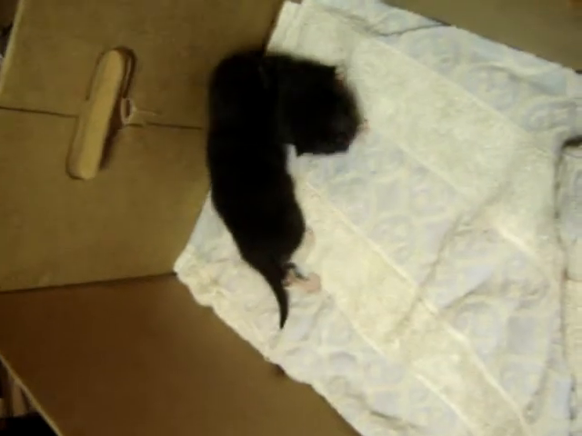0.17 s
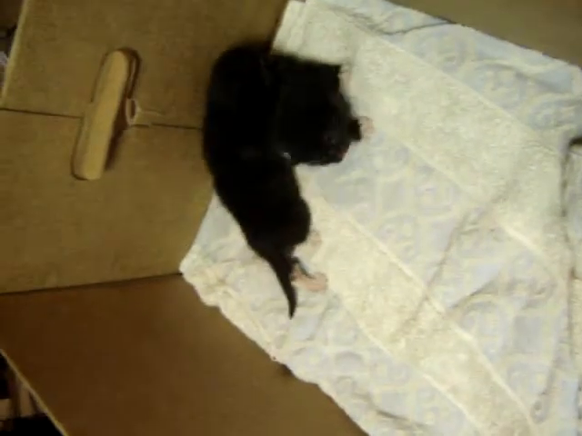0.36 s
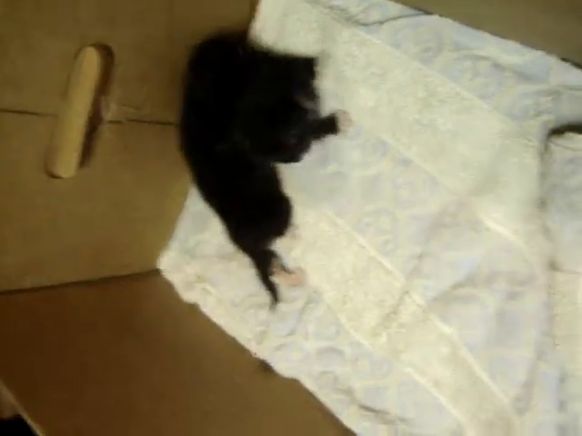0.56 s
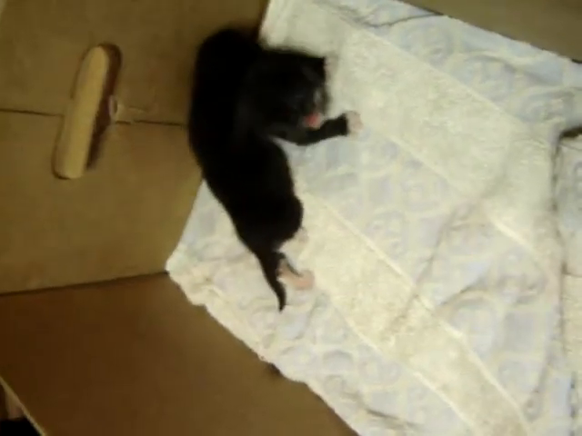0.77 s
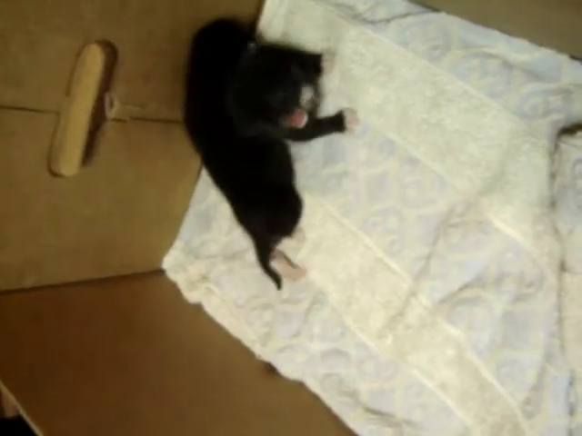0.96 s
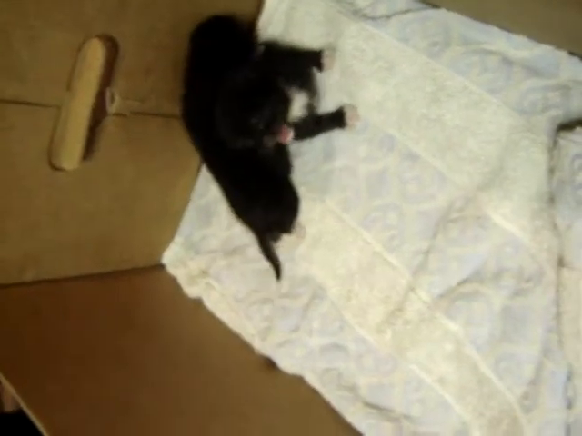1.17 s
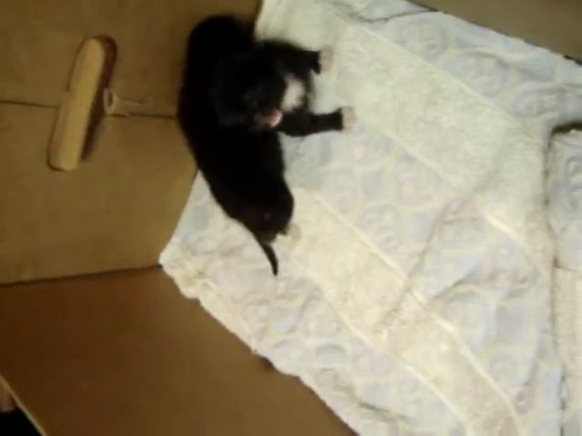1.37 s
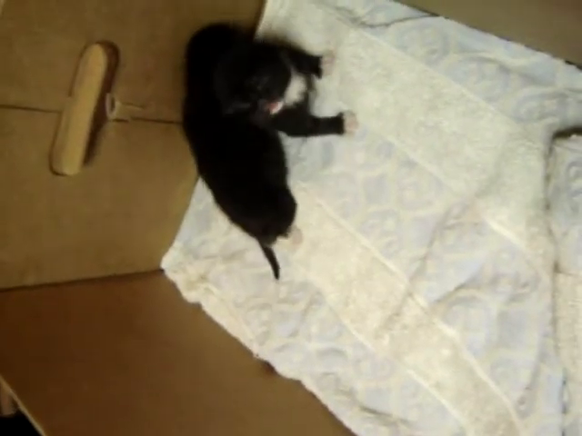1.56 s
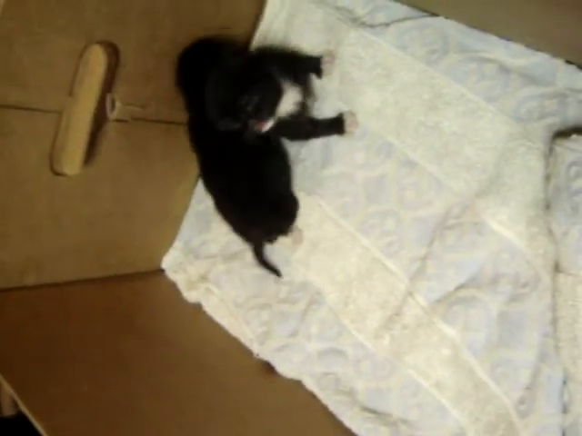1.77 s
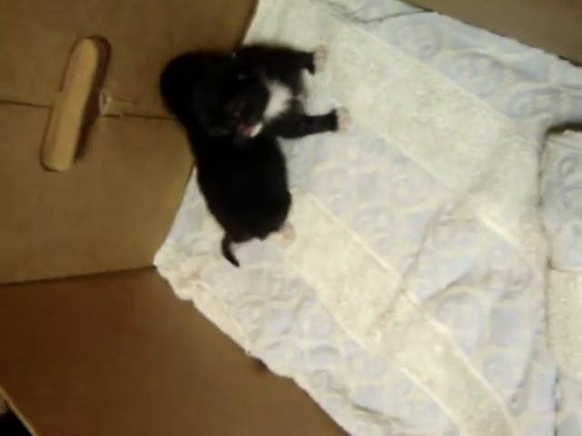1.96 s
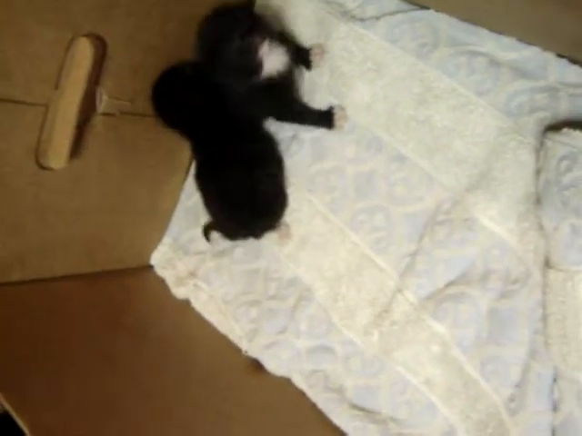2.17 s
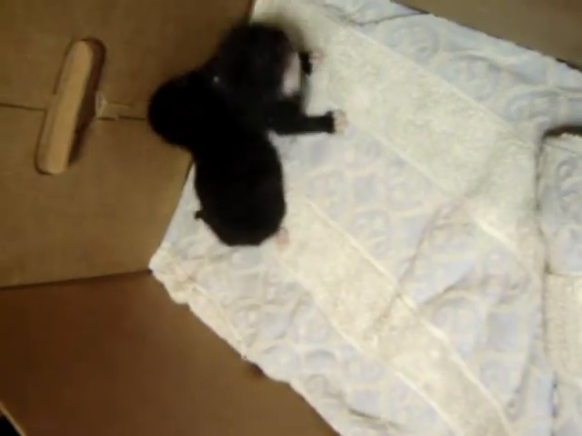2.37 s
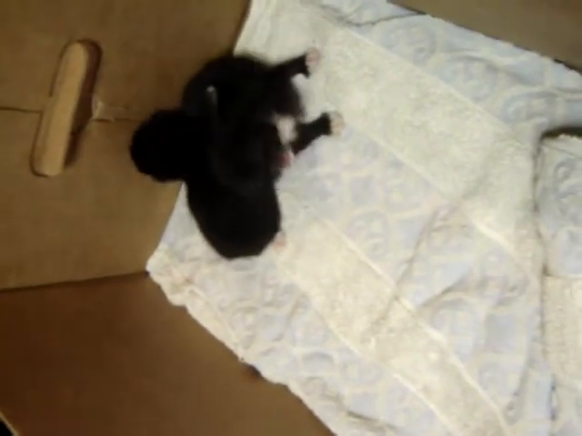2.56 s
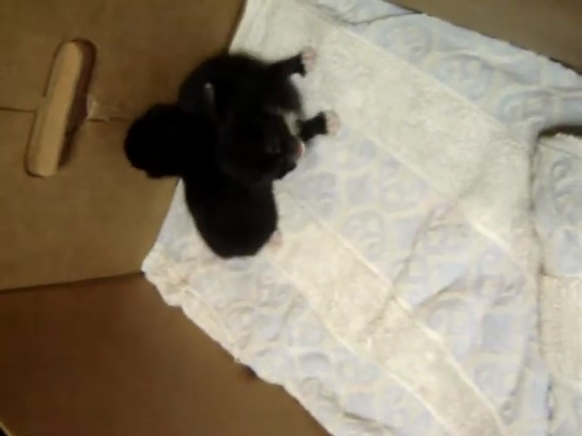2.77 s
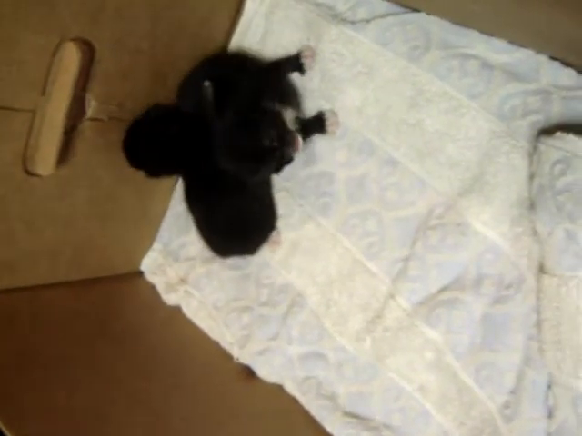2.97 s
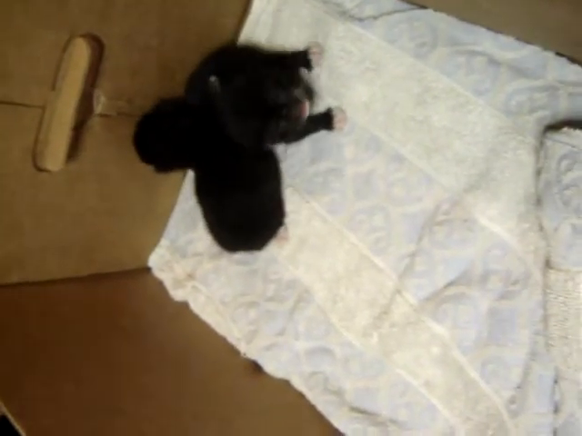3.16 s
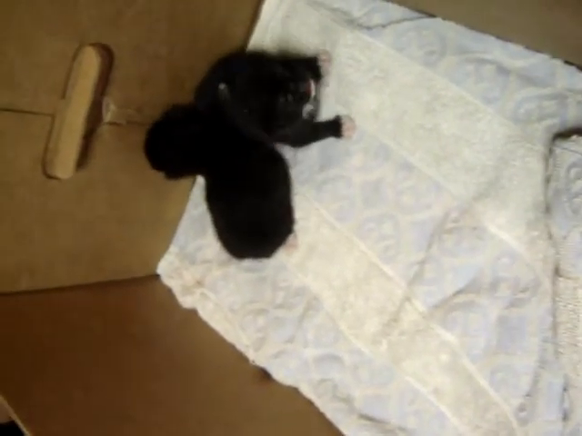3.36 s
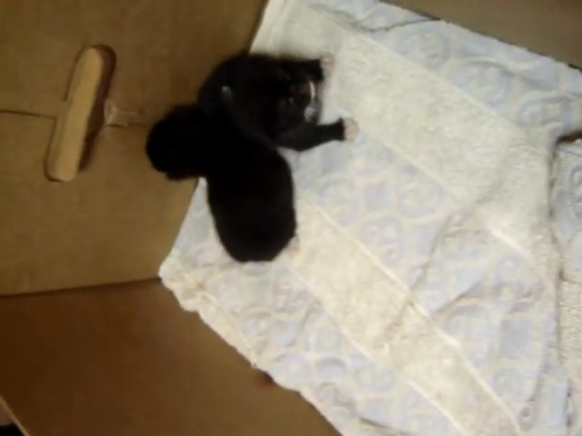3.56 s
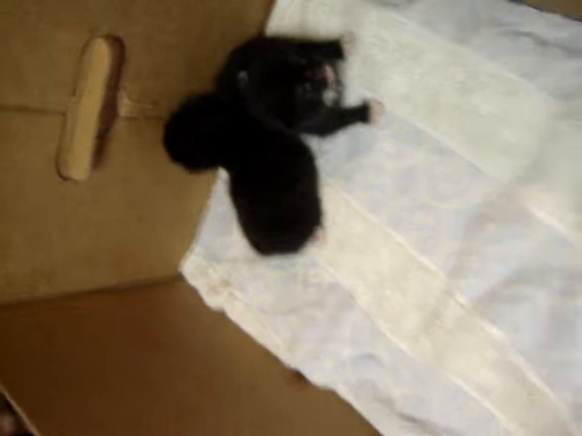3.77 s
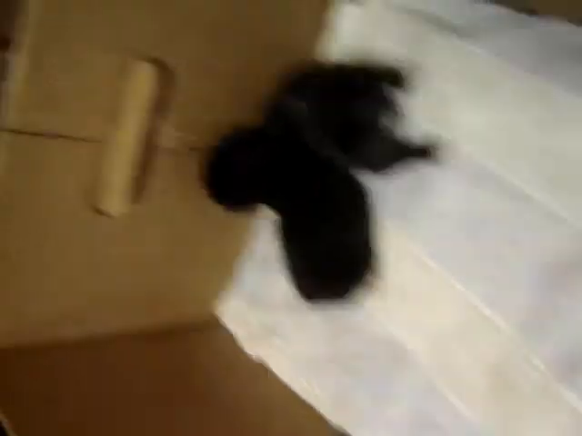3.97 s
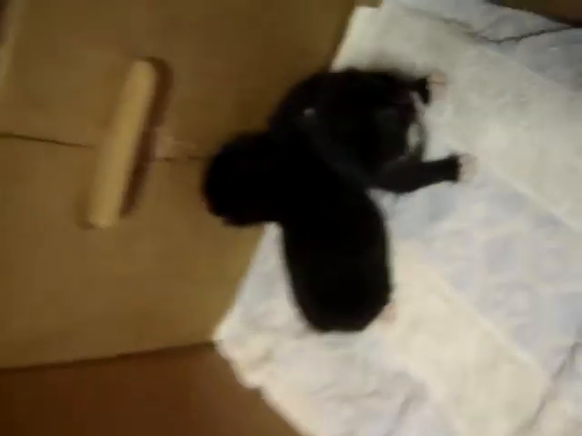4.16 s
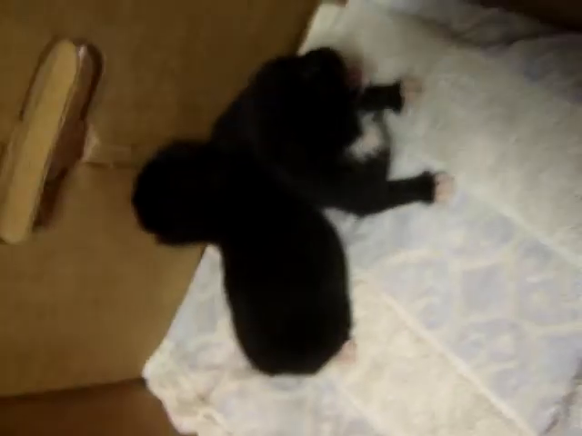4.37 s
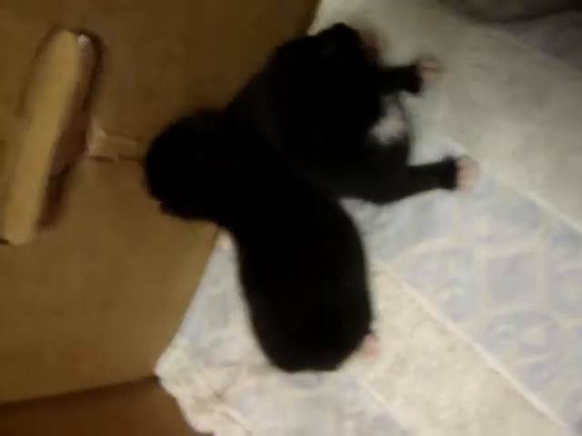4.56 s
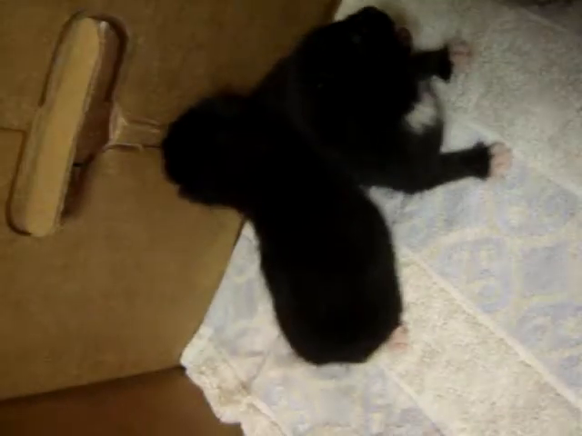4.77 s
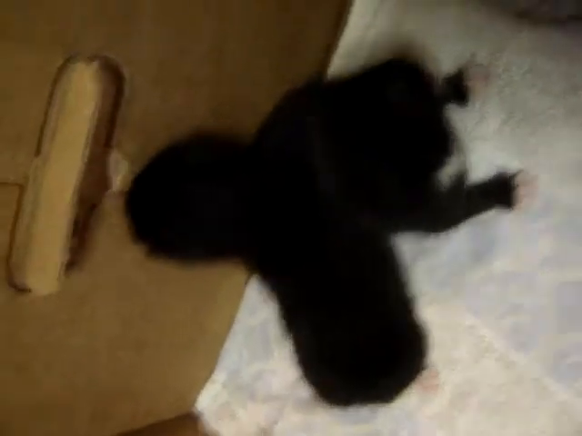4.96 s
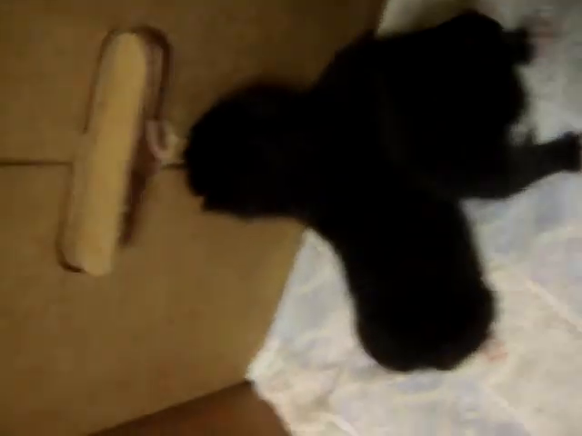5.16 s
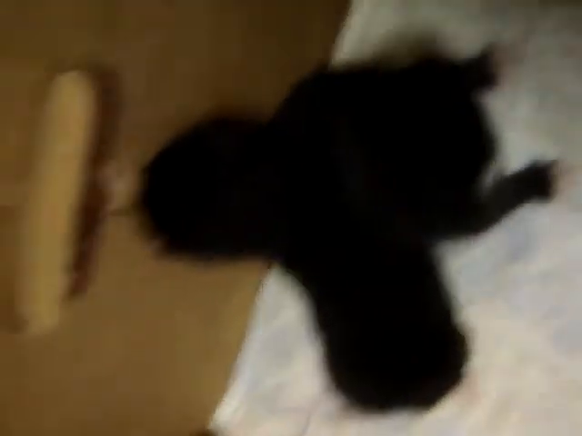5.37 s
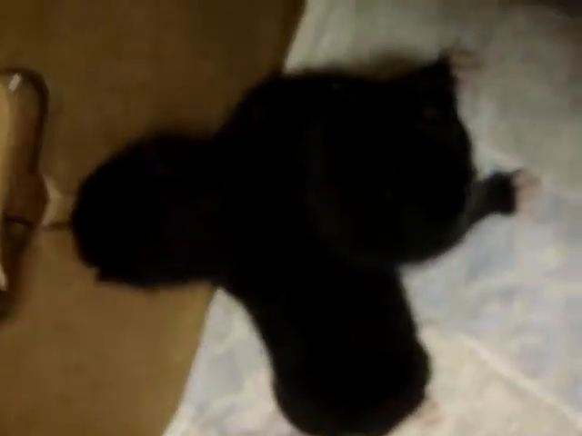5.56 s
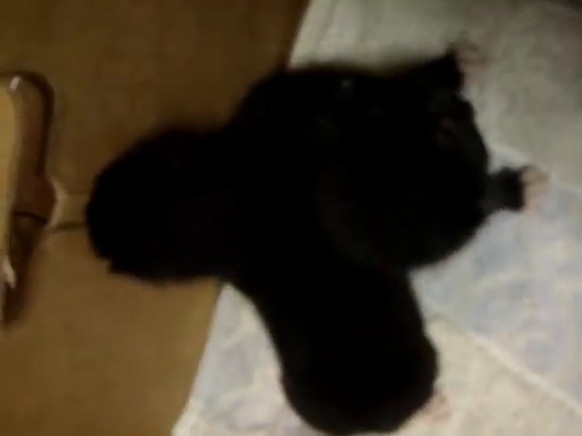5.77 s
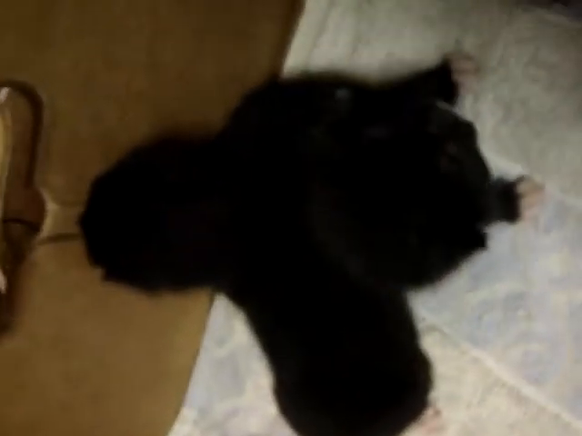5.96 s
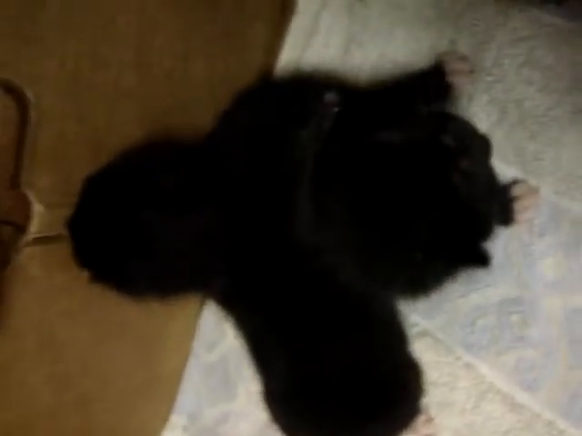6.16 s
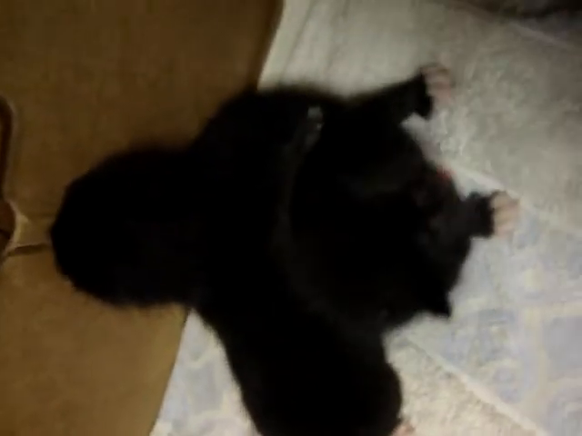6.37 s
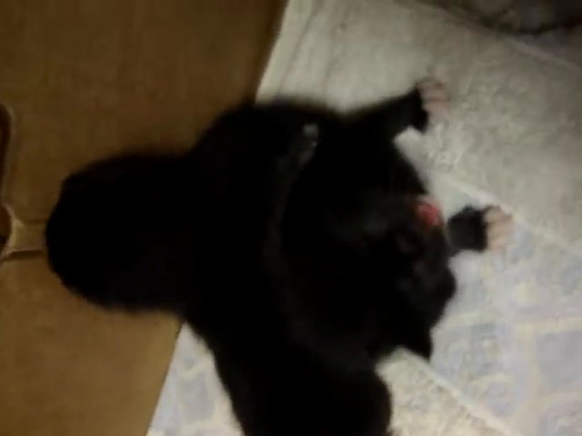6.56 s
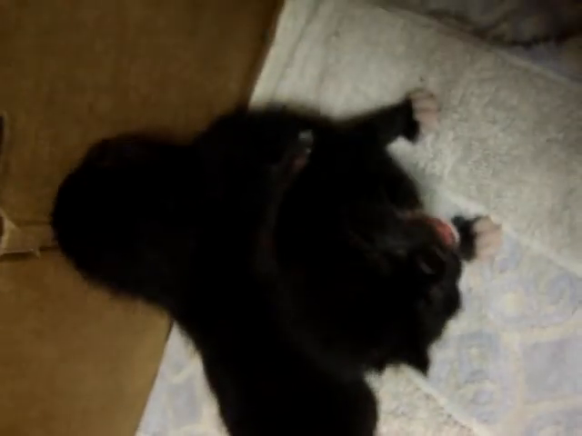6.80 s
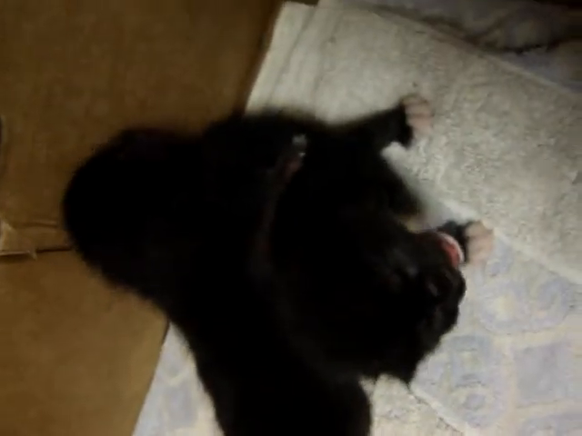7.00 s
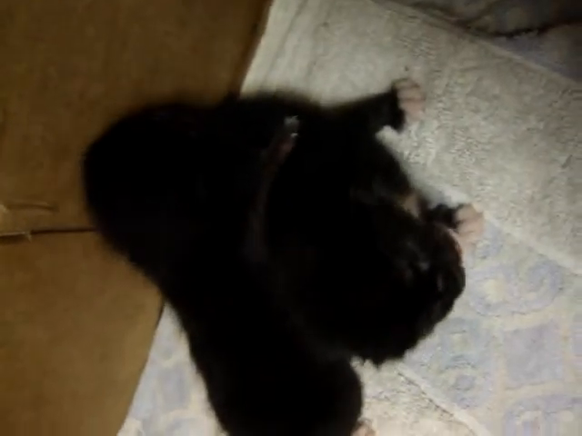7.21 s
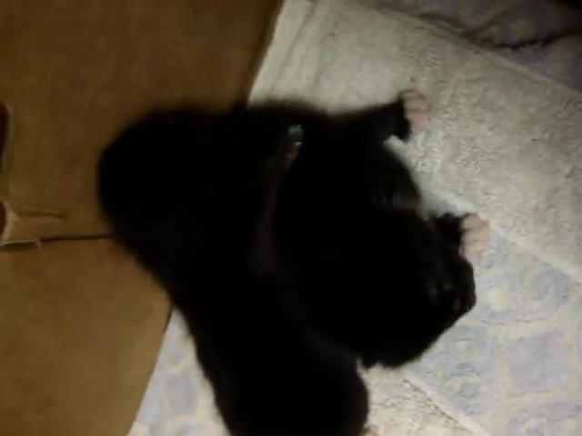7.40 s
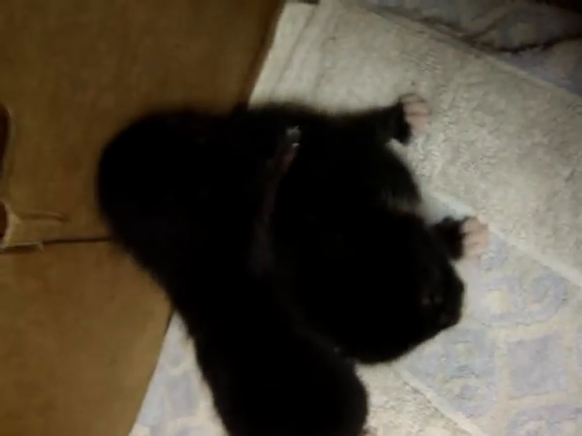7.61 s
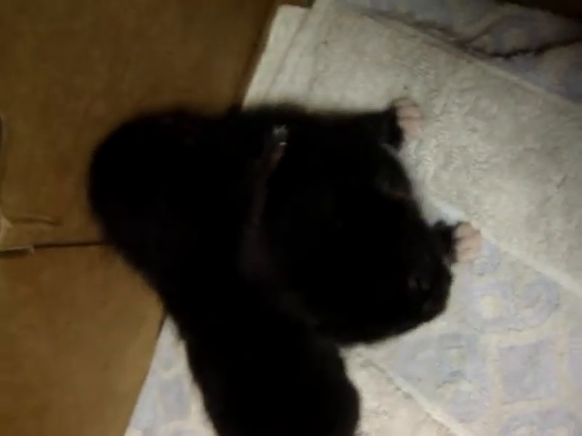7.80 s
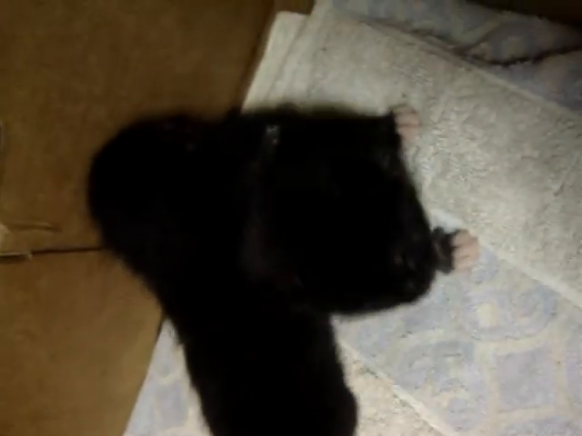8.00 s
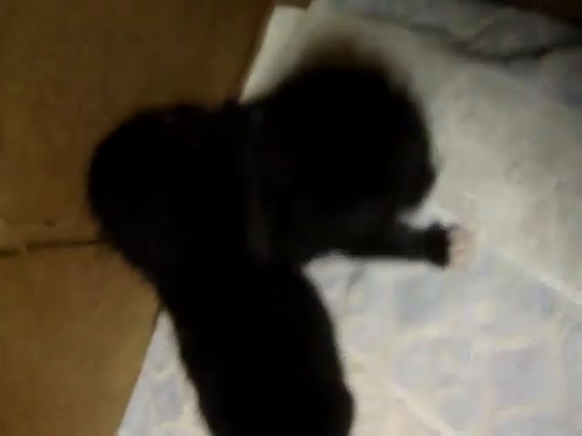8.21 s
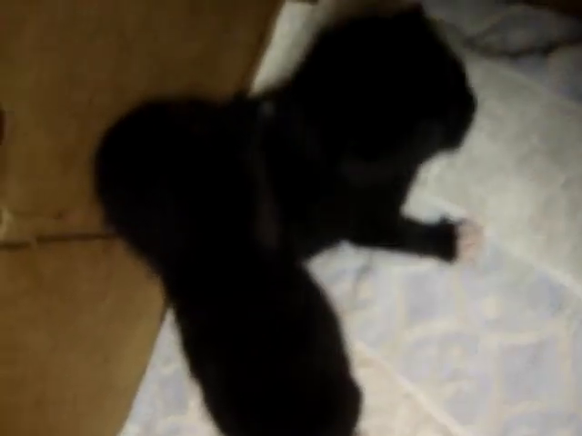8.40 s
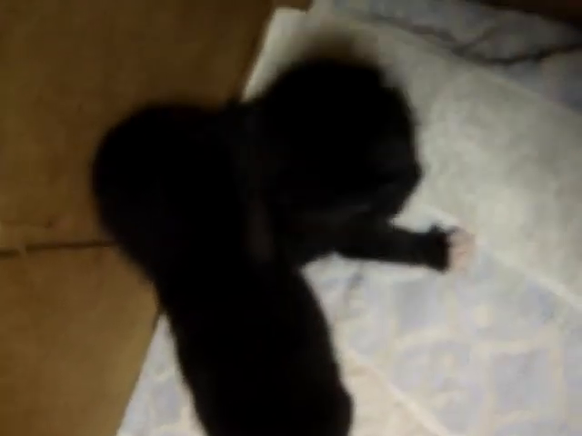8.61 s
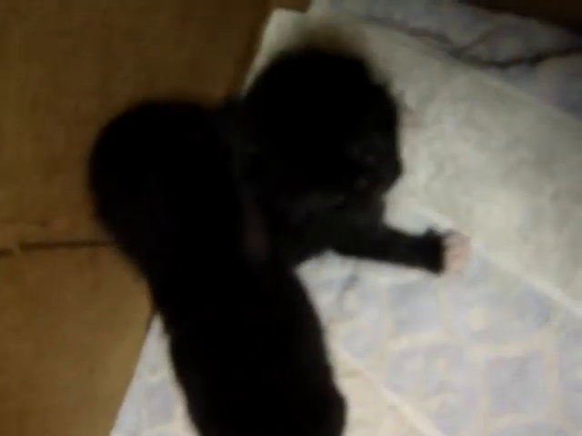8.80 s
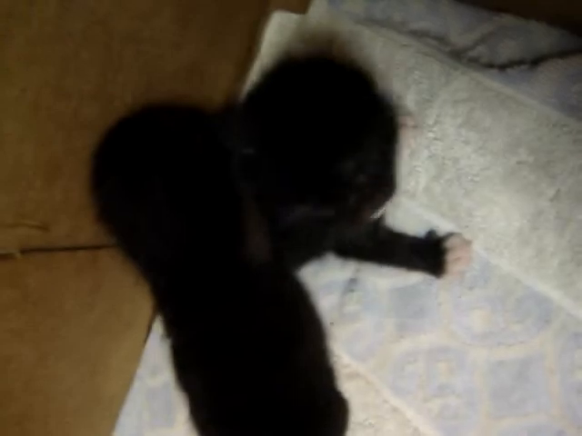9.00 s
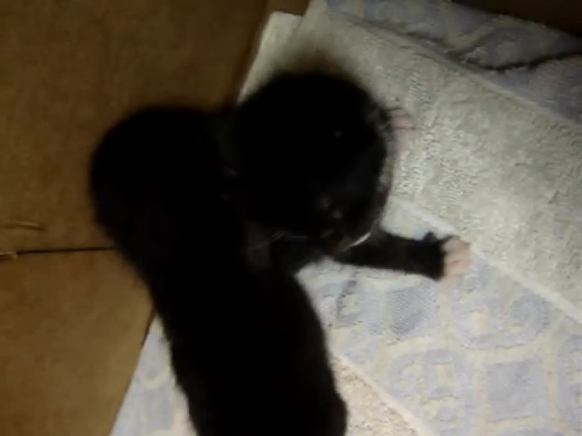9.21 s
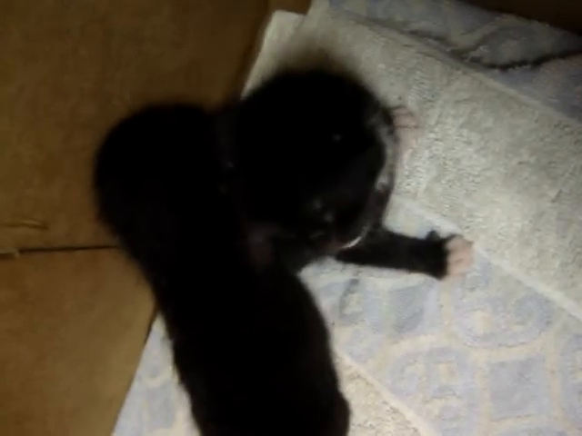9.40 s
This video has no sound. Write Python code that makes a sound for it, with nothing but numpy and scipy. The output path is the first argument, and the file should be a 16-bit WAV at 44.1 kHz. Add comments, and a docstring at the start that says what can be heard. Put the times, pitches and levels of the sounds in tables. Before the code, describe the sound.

A small, quiet room hums low, with dull rumble and soft hiss, captured in close mono with a muted top. Light ticks come before a young kitten's first mew at 0.6 s, a thin cry that climbs quickly and falls away by 1.9. A brighter, stronger one arches from 2.2 to 3.5. Clicks and taps cluster from 3.5 to 4.5, sharpest near 3.8 and 4.35. The third, loud and piercing, runs 4.2 to 5.3 amid paw shuffles, ending with a tiny gasp. Rumble thickens as the hum sinks. After a pause with a few ticks, a raspy fourth cry starts at 6.3 and sags slowly until 8.0; a second kitten peeps faintly at 6.6. Two hissing, whistling gasps follow at 8.0 to 8.2. At 8.6 a weak, hoarse mew wavers, falls into a short croak at 9.0, and ends with a last faint gasp amid small ticks.

```python
"""Inside a cardboard box in a small room, hum, low rumble and hiss lie under paw shuffles and ticks of claws and shell.
A young kitten, close to a small mono microphone, mews: gliding overtones and pulsed breath in throat resonances.
Three long arched cries come first, a short gasp of hissing, whistling air after the third; the rumble swells and hum sinks.
A second kitten peeps faintly, two sagging partials, over the fourth cry, and a gasp in two strokes follows it.
A fifth, hoarser cry runs into a short falling croak and a last small gasp."""
import sys
import numpy as np
from scipy import signal
from scipy.io import wavfile
from scipy.ndimage import uniform_filter1d

SR = 44100
rng = np.random.default_rng(int(sys.argv[2]) if len(sys.argv) > 2 else 0)


def wrap_up_sound(samples):
    """Save the sound to the file named by the first command line argument, as 16-bit audio."""
    columns = np.atleast_2d(samples).T
    # keep every value between -1 and 1, then stretch to whole-number steps
    tamed = np.clip(columns, -1, 1)
    steps = np.round(tamed * 32767).astype(np.int16)
    wavfile.write(sys.argv[1], SR, steps)


N = 416744  # samples

# Room air, spectral colour before the overall level is set: freq_hz, density_db (relative)
AIR_COLOUR = [(12, -43.5), (20, -49), (87, -10), (119, 10), (146, -33), (185, -0.5), (281, -11.5),
              (1040, -13.5), (1460, -21.5), (1850, -20.5), (2220, -24), (3290, -25.5), (3950, -29.5),
              (9120, -32), (10400, -36), (13500, -70.5), (22000, -120)]
# Level of the room air over time: time_s, level_db
AIR_LEVEL = [(0.0, -46.5), (3.37, -48), (5.26, -44.5), (5.61, -47), (8.29, -46), (8.69, -48), (9.19, -46.5),
             (9.45, -48)]
# Gain on the lowest air as the microphone moves into the box: time_s, gain_db
RUMBLE_GAIN = [(0, 0), (4.5, 2.4), (6.0, 4), (9.45, 4.2)]
# Mains hum lines, before their waver and fade: freq_hz, level_db (rms)
HUM_LINES = [(118.4, -52.5), (188.4, -60.5), (226.1, -63.5)]
# The hum sinks as the microphone moves into the box: time_s, gain_db
HUM_GAIN = [(0, 2.5), (5, 0), (9.45, -6.5)]
# Paws on cloth and cardboard: start_s, rise_s, fall_s, level_db (at the height of the stroke), centre_hz
SHUFFLES = [(4.44, 0.042, 0.44, -34.5, 1500), (4.931, 0.035, 0.56, -44, 295),
            (5.028, 0.031, 0.091, -35, 1180), (5.44, 0.066, 0.081, -48.5, 1710)]
# Claws and camera shell: start_s, level_db, ring_hz, edge_level_db (relative), edge_hz
TICKS = [(.349, -37, 425, 6.5, 2800), (.589, -28, 637, -3, 2000), (1.2, -36, 1120, 2, 2000),
         (1.847, -32.5, 2080, -3, 3420), (1.881, -34, 2430, 5, 5970), (2.027, -30, 520, -11, 2500),
         (2.138, -39, 1910, -12, 2500), (3.53, -40, 2250, 16.5, 3760), (3.664, -35, 776, -2, 1800),
         (3.757, -31, 340, -2, 1500), (3.804, -13, 1015, -9.5, 3370), (3.838, -29.5, 1720, -8, 3020),
         (3.9152, -37, 910, 9, 3420), (3.982, -33, 1810, 11, 4570), (4.062, -32, 335, 7, 1840),
         (4.088, -39.5, 810, 13.5, 5160), (4.103, -31, 840, 2.5, 2670), (4.348, -10, 1535, 5, 2900),
         (4.458, -16, 950, -4, 2000), (4.479, -25, 1270, 9, 1890), (5.136, -27, 1170, 8, 1800),
         (5.488, -34, 414, 5.5, 2480), (5.818, -37, 690, -13, 1500), (5.871, -33.5, 448, 4, 3930),
         (6.934, -32, 495, 9, 1700), (8.061, -31, 775, 3, 2530), (8.2736, -38.5, 1780, 11, 2980),
         (9.02, -32, 800, -6, 2954), (9.137, -25, 760, -20, 2000), (9.283, -39, 890, -6, 2000)]
# Gasps for air, one row a stroke: start_s, length_s, level_db, whistle_from_hz, whistle_to_hz,
# whistle_over_hiss_db
GASPS = [(5.291, 0.049, -55, 6750, 6550, -2), (8.003, 0.15, -35.5, 8310, 7550, 1.5),
         (8.121, 0.075, -37.5, 9100, 7750, 1.5), (9.135, .06, -51.5, 3420, 2960, 3)]
# Fixed part of the throat in a gasp: freq_hz, width_hz, level_db (relative)
GASP_MODES = [(3200, 500, -14), (4000, 400, -10), (6400, 900, -2), (8200, 2200, -2)]
# Throat resonances with the mouth wide open, low to high: freq_hz, width_hz
THROAT = [(3000, 1510), (4900, 1300), (7300, 3510), (8600, 4400)]
# Jaw and tongue lower the two lowest resonances: time_s, jaw_factor, tongue_factor
JAW = [(.6, 0.63, 0.75), (.72, 0.71, 0.63), (.9, .92, .84), (1.05, 0.93, 0.81), (1.24, 0.81, 0.58),
       (1.55, 0.68, .56), (1.8, 0.78, 0.7), (2.3, 0.7, 0.69), (2.54, 1, .82), (2.7, 0.91, 0.76),
       (3.19, 0.74, 0.82), (3.42, 0.66, 0.74), (4.3, 0.75, 0.84), (4.45, 0.79, 0.88), (4.65, 0.6, 0.87),
       (4.8, 1, .86), (5.05, 0.81, .75), (5.21, 0.91, 0.86), (6.36, .63, 0.67), (6.66, 0.73, 0.71),
       (6.7, 0.73, 0.74), (6.86, 0.75, 0.74), (7.05, 0.71, 0.76), (7.45, 0.72, .8), (8.0, 0.83, .79),
       (8.59, 0.59, .61), (9.0, 0.46, 0.59), (9.09, 0.57, 0.59)]
# One table a mew: time_s, pitch_hz, low_resonance_db, middle_resonance_db, treble_db
MEWS = [
    [(.575, 545, -47, -50, -59), (.67, 893, -55.5, -46.5, -61), (.76, 1185, -38, -37, -52),
     (.82, 1345, -39.5, -52, -56), (.92, 1406, -35, -53, -54), (1.05, 1332, -48, -44, -46),
     (1.11, 1285, -36, -56, -59), (1.17, 1218, -32, -62, -54), (1.3, 1009, -40.5, -65, -55),
     (1.44, 980, -42, -80, -53.5), (1.56, 860, -42.5, -83, -59.5), (1.77, 632, -49.5, -59, -63),
     (1.87, 488, -55, -56, -61)],
    [(2.23, 648, -48, -50, -71), (2.29, 682, -53.5, -53.5, -70), (2.35, 960, -40, -59, -49),
     (2.42, 1211, -34, -24, -39.5), (2.54, 1379, -42.5, -22.5, -27.5), (2.62, 1259, -55, -14, -35.5),
     (2.67, 1187, -44, -19, -33), (2.8, 1081, -46.5, -31.5, -36.5), (2.95, 988, -39, -30.5, -36),
     (3.14, 901, -41, -34, -41), (3.2, 945, -40, -42, -42), (3.29, 886, -45, -44, -44.5),
     (3.4, 658, -58, -38.5, -44.5), (3.46, 470, -59, -43, -46.5), (3.53, 441, -52, -48, -51)],
    [(4.22, 470.6, -52, -53, -68), (4.275, 597, -46, -48, -49), (4.345, 1000, -37, -29.5, -42.5),
     (4.4, 1235, -30, -23, -35.5), (4.46, 1323, -30, -18.5, -35.5), (4.6, 1285, -31, -19.5, -37.5),
     (4.73, 1210, -28, -28, -34), (4.765, 1208, -42.5, -33, -36.5), (4.8, 1147, -25.5, -26.5, -35),
     (4.88, 1069, -26, -27.5, -35), (4.98, 969, -31, -25, -35), (5.04, 921, -29.5, -38.5, -36),
     (5.11, 859, -37, -38, -42.5), (5.16, 665, -39.5, -39.5, -44.5), (5.21, 530, -40, -44, -44),
     (5.28, 429, -42.5, -45, -50)],
    [(6.33, 430.5, -42, -54, -49), (6.37, 542.6, -51.5, -43, -52.5), (6.46, 784, -37, -51, -45.5),
     (6.53, 945, -32, -43.5, -34.5), (6.56, 1069, -36, -44, -35), (6.672, 1093, -35.5, -50, -34),
     (6.688, 1066, -37, -32, -30), (6.76, 1022, -37, -37, -28.5), (6.87, 942, -35, -38, -32.5),
     (6.905, 1003, -38.5, -32, -34), (6.95, 918, -35, -40.5, -33), (7.07, 860, -40, -44.5, -36.5),
     (7.3, 764, -44.5, -38, -39.5), (7.68, 774, -48, -35.5, -45), (7.8, 728, -50.5, -42.5, -41.5),
     (7.92, 690, -51, -40.5, -44.5), (8.01, 615, -42, -42, -50)],
    [(8.56, 826, -60, -61, -70), (8.59, 873, -49.5, -52.5, -61), (8.7, 987, -52, -50, -60),
     (8.755, 892, -45, -48, -66), (8.8, 1046, -55, -51.5, -66), (8.88, 1040, -54, -51, -72),
     (9.015, 900, -47, -66, -78)],
    [(9.005, 900, -48, -45, -76), (9.055, 803, -43, -55, -78), (9.085, 687, -41, -45, -75),
     (9.115, 599, -42, -61, -74), (9.135, 550, -69, -60, -70)],
]
# One row a mew: nose_and_chest_db (before the mouth opens), top_over_treble_db,
# top_change_db (as the mouth shuts), lips_factor (third resonance, at the top pitch)
MOUTHS = [(-52, -9, -37, .9), (-52, -24, -5, 0.96), (-46.5, 0.5, -23, 0.97), (-42.5, -22, 29, 0.92),
          (-41, -13, 3, .8), (-40, -10, 1.5, .75)]
# One row a mew: first_hoarseness (0-1), clears_s, breaks_s (into rasp), frays_s, rasp_before (0-1),
# rasp_after (0-1), rasp_ease_per_s, final_hoarseness (0-1)
ROUGHNESS = [(.7, .68, 1.6, 1.8, .26, .3, 0, .75), (.35, 2.31, 2.66, 3.45, .16, .62, .05, .75),
             (.9, 4.32, 4.77, 5.2, .3, .6, 0, 1), (.75, 6.5, 6.675, 7.93, .58, .7, .19, .55),
             (1, 8.79, 8.98, 9.0, .2, .3, 0, .3), (1, 9.095, 9.08, 9.065, .9, .9, 0, .35)]

RUMBLE_TOP_HZ, MICROPHONE_TOP_HZ = 380, 10080
SHUFFLE_ENDS_DB = -18  # start and end of a stroke, below its height
TICK_T60_S, TICK_CYCLES = .011, 4  # the cycles add to the decay, so lower ticks ring longer
PEEP_START_S, PEEP_LENGTH_S, PEEP_DB, PEEP_FADE_DB = 6.55, .25, -34.5, -11
PEEP_HZ, PEEP_SAG_HZ = 1030, 227
GASP_RISE_S, GASP_FALL_S = 0.0082, .02
BREAK_S, FRAY_S = .02, .06
LIPS_SHUT = 0.76  # the third resonance sinks toward this share as pitch falls and the mouth closes
NOSE_OPEN_DB = -4.5  # less leaks through the nose as the mouth opens


def amp(db):
    """Turns decibels into an amplitude factor."""
    return 10 ** (np.asarray(db) / 20)


def evened(x):
    """Scales a signal to rms 1."""
    return x / np.sqrt(np.mean(x ** 2) + 1e-20)


def add(mix, s, sound):
    """Lays a sound into the mix at s seconds, cut at the end of the mix."""
    part = mix[round(s * SR):][:len(sound)]
    part += sound[:len(part)]


def sampled(rows, t):
    """The columns of a table at the times t."""
    s, *columns = np.transpose(rows)
    return [np.interp(t, s, c) for c in columns]


def ramp(t, s, length):
    """Goes from 0 to 1 between s and s + length."""
    return np.clip((t - s) / length, 0, 1)


def wander(count, hz):
    """Slow chance of rms 1, with little above hz."""
    lowpass = signal.butter(2, hz / SR * 2)
    settled = signal.lfilter(*lowpass, rng.standard_normal(count + 4000))[4000:]
    return evened(settled)


def resonate(x, hz, width):
    """Shifts the curve hz down to zero, smooths twice, and shifts back: a steep resonance of gain 1."""
    turn = np.exp(2j * np.pi * np.cumsum(hz * np.ones(len(x))) / SR)
    r = np.exp(-np.pi * abs(width) / SR)
    smoothed = signal.lfilter([(1 - r) ** 2], [1, -2 * r, r * r], x / turn)
    return 2 * (turn * smoothed).real


def room_air():
    """Rumble and hiss from random short-time spectra whose patches of level drift."""
    hop, size = 256, 1024
    frames, hz = N // hop + 5, np.fft.rfftfreq(size, 1 / SR)
    real, imaginary, patches = rng.standard_normal((frames, len(hz), 3)).T
    patches = evened(uniform_filter1d(uniform_filter1d(patches, 12, 0), 12, 1))
    f, db = np.transpose(AIR_COLOUR)
    colour_db = np.interp(np.log(hz + 1), np.log(f), db)[:, None]
    rumble_gain_db = sampled(RUMBLE_GAIN, np.arange(frames) * hop / SR)[0]
    colour_db = colour_db + (hz < RUMBLE_TOP_HZ)[:, None] * rumble_gain_db
    spectra = (real + 1j * imaginary) * amp(colour_db + patches)
    air = evened(signal.istft(spectra, nperseg=size, noverlap=size - hop)[1][:N])
    return amp(sampled(AIR_LEVEL, np.arange(N) / SR)[0]) * air


def mains_hum():
    """Steady mains lines that waver a little in level and phase."""
    t = np.arange(N) / SR
    hum = np.zeros(N)
    for hz, db in HUM_LINES:
        level = np.sqrt(2) * amp(db + 1.4 * wander(N, 6.1))
        hum += level * np.cos(2 * np.pi * (hz * t + .08 * wander(N, 1.5)))
    return amp(sampled(HUM_GAIN, t)[0]) * hum


def box_echoes(x):
    """The cardboard walls and the small room: sparse taps of random sign that die fast."""
    at = np.arange(60, 12000, 20) + rng.integers(0, 20, 597)
    taps = np.zeros(12040)
    taps[at] = rng.choice([-1., 1.], len(at)) * amp(-60 * at / SR / .12)  # 60 dB down in .12 s
    return signal.oaconvolve(x, taps / np.linalg.norm(taps))[:N]


def shuffle(s, rise, fall, db, hz):
    """Clumped grains of friction in one broad, dull resonance."""
    t = np.arange(0, rise + fall, 1 / SR)
    grains = rng.standard_normal(len(t)) * amp(5.9 * wander(len(t), 33))
    stroke_db = SHUFFLE_ENDS_DB * (1 - ramp(t, 0, rise) + ramp(t, rise, fall))
    return s, amp(db + stroke_db) * evened(resonate(grains, hz, 2400))


def tick(s, db, hz, edge_db, edge_hz):
    """A short ring with a partner mode, and a spit of brighter noise on top."""
    t = np.arange(2000) / SR
    ring = np.sin(2 * np.pi * hz * t) + .5 * np.sin(2 * np.pi * 1.824 * hz * t)
    ring *= amp(-60 * t / (TICK_T60_S + TICK_CYCLES / hz))
    edge = evened(resonate(rng.standard_normal(len(t)), edge_hz, 0.96 * edge_hz))
    edge *= amp(edge_db - 60 * t / 0.013)
    attack = np.minimum(t / 0.00078, 1)
    return s, amp(db) * (1.43 * ring + .5 * edge) * attack


def peep():
    """The second kitten's thin voice: a fundamental and a louder octave, sagging in pitch as it fades."""
    u = np.arange(0, PEEP_LENGTH_S, 1 / SR) / PEEP_LENGTH_S  # 0 to 1 along the peep
    hz = (PEEP_HZ - PEEP_SAG_HZ * u ** 2) * (1 + 0.034 * wander(len(u), 60))
    turns = np.cumsum(hz) / SR
    voice = amp(-4.5) * np.cos(2 * np.pi * turns) + np.cos(4 * np.pi * turns)
    return PEEP_START_S, amp(PEEP_DB + PEEP_FADE_DB * u) * voice * signal.windows.tukey(len(u), .2)


def gasp(s, length, db, from_hz, to_hz, whistle_db):
    """Air drawn through the narrow throat: hiss in its modes and a fuzzy, falling whistle."""
    t = np.arange(0, length, 1 / SR)
    air = rng.standard_normal(len(t)) * amp(2.1 * wander(len(t), 78))
    hiss = sum(amp(g) * evened(resonate(air, f, w)) for f, w, g in GASP_MODES)
    whistle = evened(resonate(air, from_hz + (to_hz - from_hz) * t / length, 540))
    envelope = ramp(t, 0, GASP_RISE_S) * ramp(-t, -length, GASP_FALL_S)
    return s, amp(db) * (evened(hiss) + amp(whistle_db) * whistle) * envelope


def roughness(t, first, clears, breaks, frays, before, after, ease, final):
    """Rasp and hoarseness: the voice clears from its start, changes rasp at a break and frays at its end."""
    hoarse = first * (1 - ramp(t, t[0], clears - t[0]) ** 2) + final * ramp(t, frays, FRAY_S)
    rasp = before + (after - before) * ramp(t, breaks, BREAK_S) - ease * np.maximum(t - breaks, 0)
    return rasp + (1 - rasp) * hoarse, hoarse


def fold_overtones(hz, rasp):
    """Overtones of the vocal folds, each with its own waver and drift of level; also their frequencies."""
    k = np.arange(1, 22)[:, None]
    turns = (k * np.cumsum(hz) / SR + rng.random(k.shape)) % 1
    tones = np.cos(np.float32(2 * np.pi * turns))
    noise = rng.standard_normal(tones.shape, np.float32)
    flicker = evened(uniform_filter1d(uniform_filter1d(noise, 150), 150))
    swell = evened(uniform_filter1d(uniform_filter1d(flicker, 1500), 1500))
    waver_db = rasp * np.minimum(0.32 * k, 5.0) * flicker  # the high ones waver most
    drift_db = np.clip(0.84 * k - 1.1, 0, 4.5) * np.tanh(2 * swell)  # each drifts up or down by chance
    return tones * amp(np.float32(waver_db + drift_db)), np.float32(k * hz)


def mew(rows, mouth, rough):
    """Overtones of the vocal folds and pulsed breath share the throat resonances that the mouth shifts."""
    t = np.arange(rows[0][0], rows[-1][0], 1 / SR)
    hz, low_db, middle_db, treble_db = sampled(rows, t)
    rasp, hoarse = roughness(t, *rough)
    nose_db, top_db, shut_db, wide = mouth

    opening = hz / hz.max()  # the mouth opens as the pitch climbs
    jaw, tongue = sampled(JAW, t)
    lips = wide * (LIPS_SHUT + (1 - LIPS_SHUT) * opening)
    shifts = (jaw, tongue, lips, 1)
    nasal_db = nose_db + NOSE_OPEN_DB * opening ** 2
    levels_db = (low_db, middle_db, treble_db, treble_db + top_db + shut_db * (1 - opening))

    jitter = 0.0048 * wander(len(t), 33.9)
    jitter += 0.007 * rasp * wander(len(t), 119)
    jitter += .1 * hoarse * wander(len(t), 203)
    hz = uniform_filter1d(hz, 1000, mode="nearest") * (1 + jitter)
    tones, partial_hz = fold_overtones(hz, rasp)
    breath = (1 + 0.14 * tones[0]) * rng.standard_normal(len(t))  # air comes in puffs, one a cycle

    # nose and chest carry the two lowest partials
    out = np.sqrt(2) * amp(nasal_db - 4.8 * hoarse) * (tones[0] + amp(-13.5) * tones[1])
    breathiness = (.05, .25, .72, 1.45)  # the treble is breathier than the low resonances
    for db, (f, w), shift, airy in zip(levels_db, THROAT, shifts, breathiness):
        detune = (partial_hz[1:] - np.float32(f * shift)) / np.float32(w / 2)
        shape = 1 / (1 + detune ** 2) ** 2
        voiced = (shape * tones[1:]).sum(0) / np.sqrt((shape ** 2).sum(0) / 2)
        hiss = evened(resonate(breath, f * shift, 0.54 * w)) * amp(2.0 * wander(len(t), 38))
        share = np.clip(airy * rasp * np.sqrt(rasp) + hoarse, 0, 1)  # power that goes to breath
        out += amp(db) * (np.sqrt(1 - share) * voiced + np.sqrt(share) * hiss)
    croak = amp(2.8 * hoarse * wander(len(t), 130))  # hoarse folds catch and let go
    return t[0], out * croak * signal.windows.tukey(len(t), .03)


def scene():
    """Sources close to the microphone, their echoes in the box, and the room behind, on two equal channels."""
    near = np.zeros(N)
    for source, table in ((shuffle, SHUFFLES), (tick, TICKS), (gasp, GASPS)):
        for row in table:
            add(near, *source(*row))
    add(near, *peep())
    for rows, mouth, rough in zip(MEWS, MOUTHS, ROUGHNESS):
        add(near, *mew(rows, mouth, rough))
    echoes = amp(-17) * box_echoes(near)
    return np.tile(near + echoes + room_air() + mains_hum(), (2, 1))


def record(dry):
    """One small microphone on both channels, with its treble cut off steeply."""
    lowpass = signal.firwin(1023, MICROPHONE_TOP_HZ, window=("kaiser", 9), fs=SR)
    return signal.oaconvolve(dry, lowpass[None], "same")


dry = scene()
out = record(dry)
wrap_up_sound(out)
```